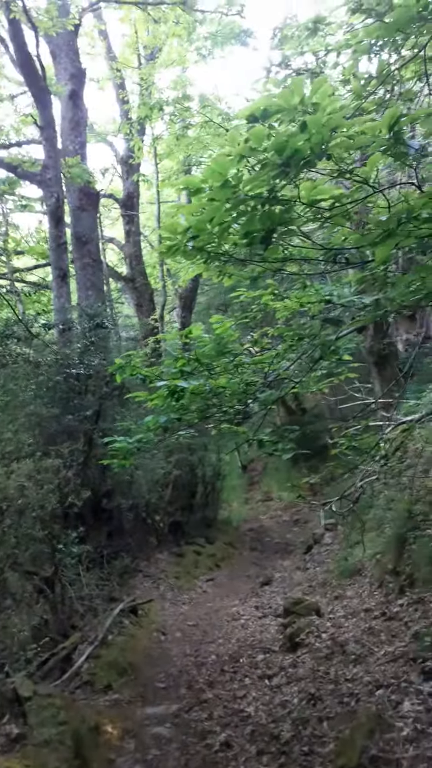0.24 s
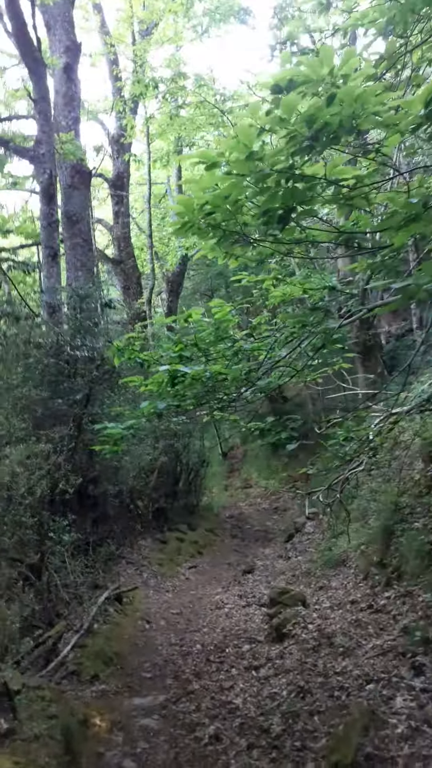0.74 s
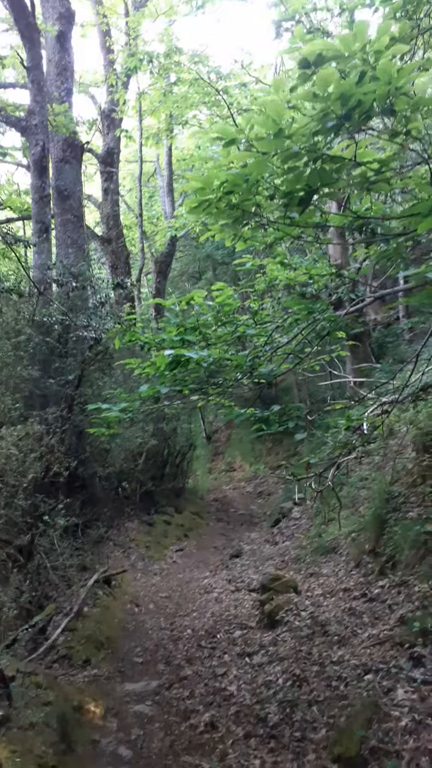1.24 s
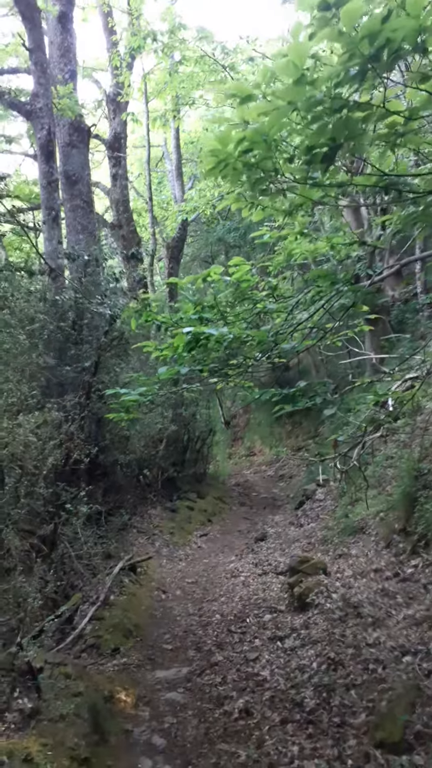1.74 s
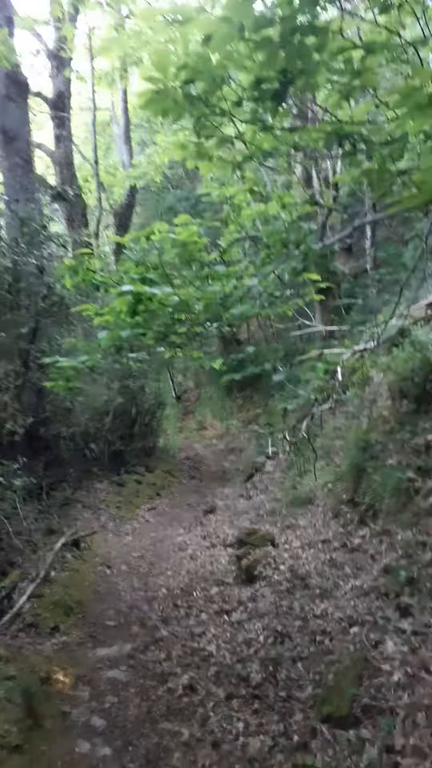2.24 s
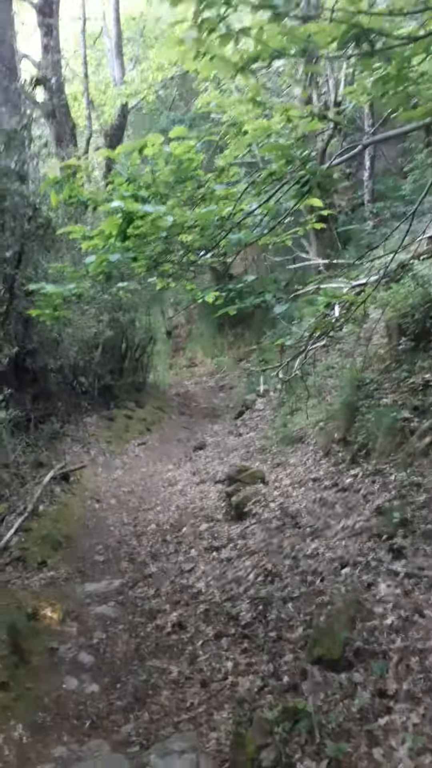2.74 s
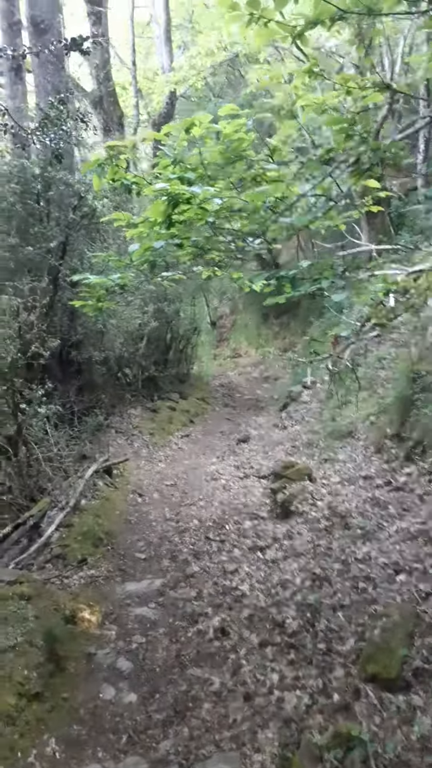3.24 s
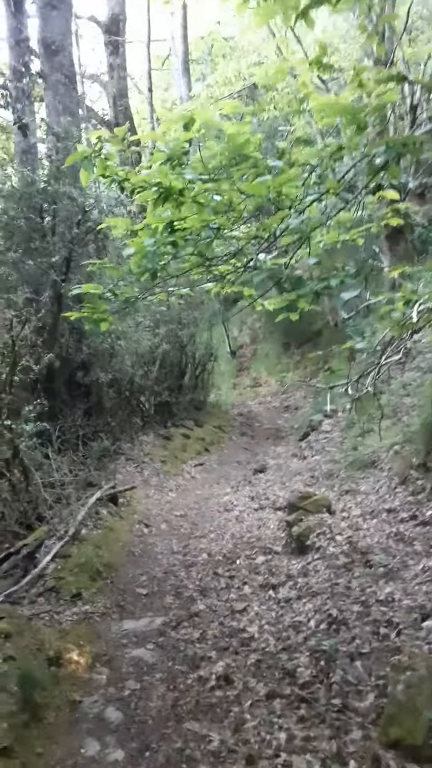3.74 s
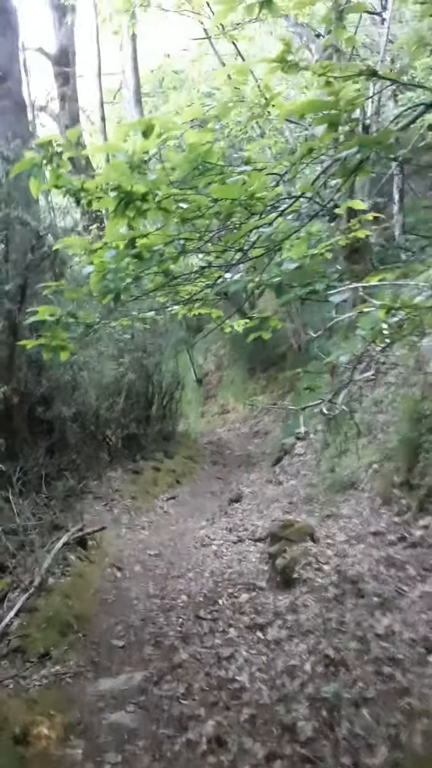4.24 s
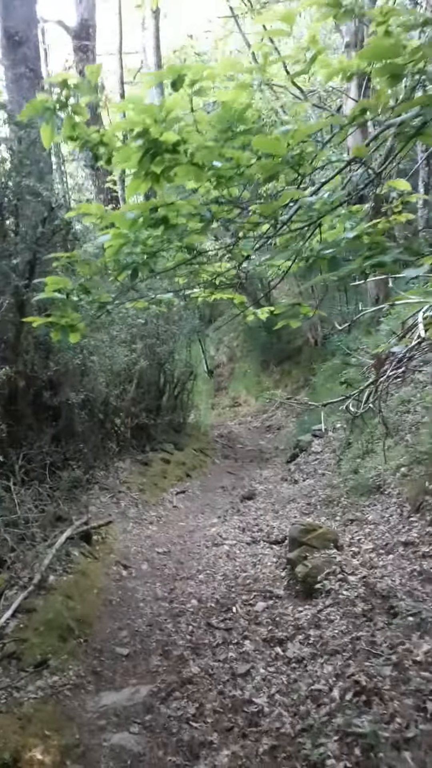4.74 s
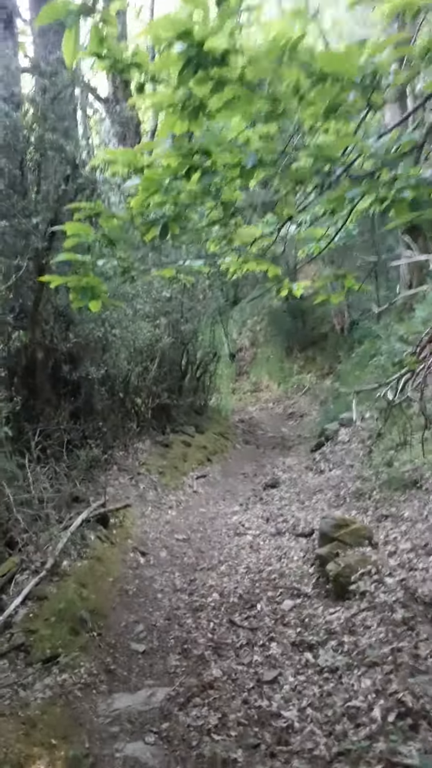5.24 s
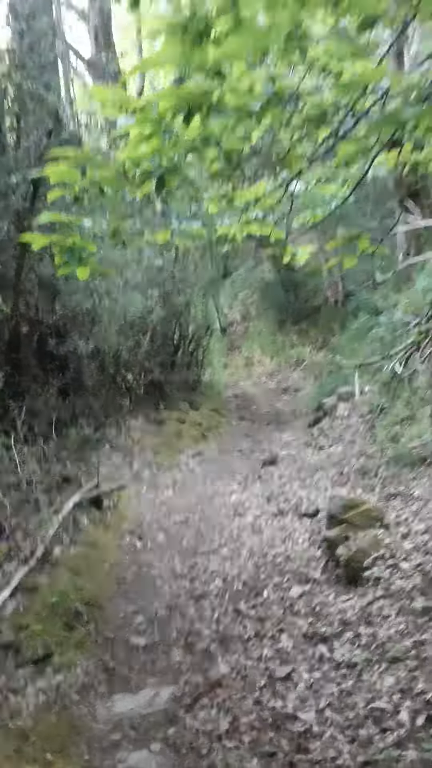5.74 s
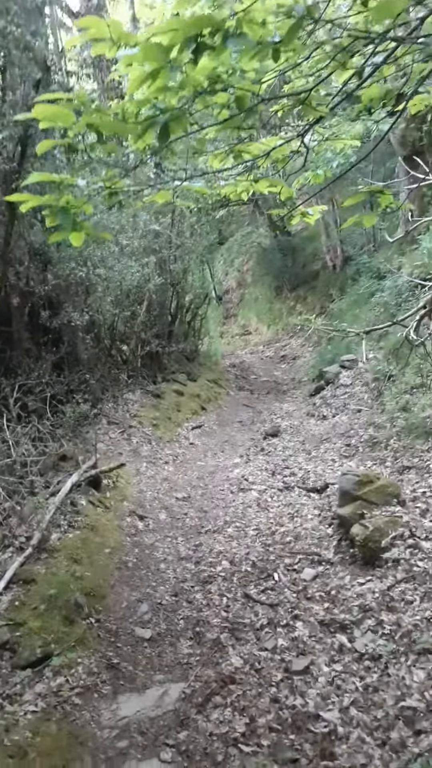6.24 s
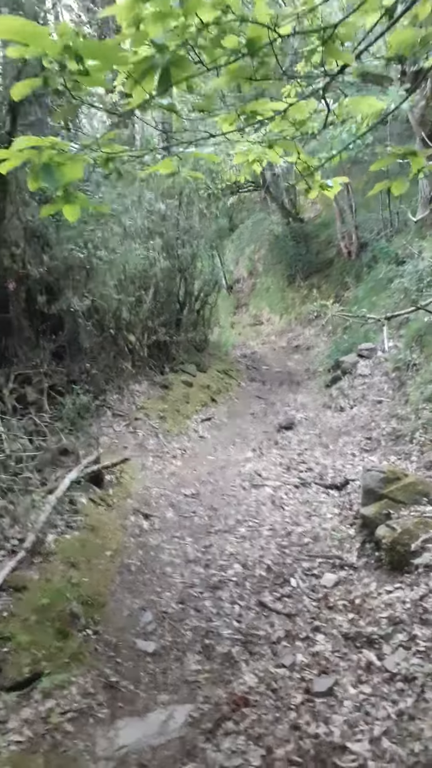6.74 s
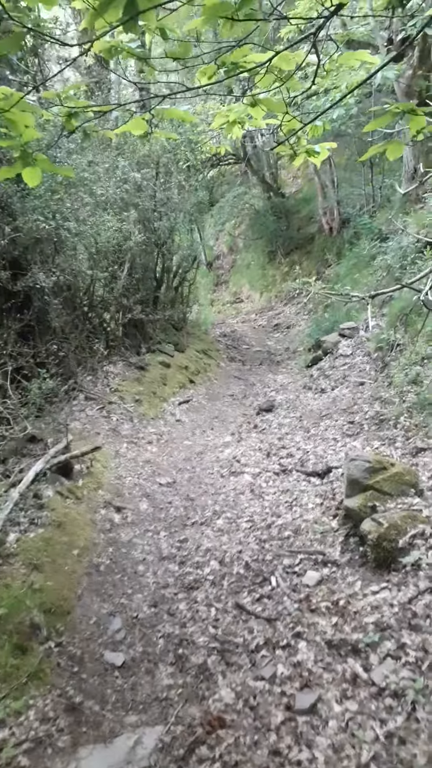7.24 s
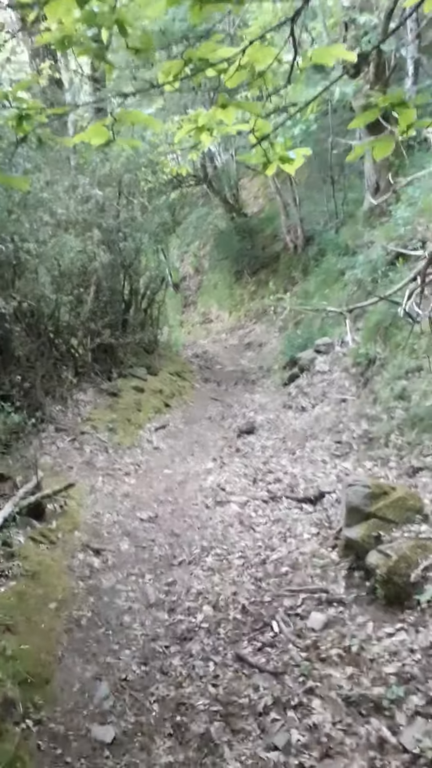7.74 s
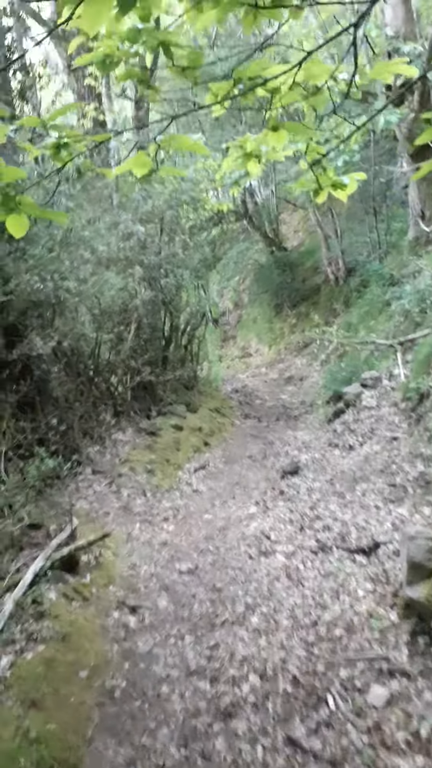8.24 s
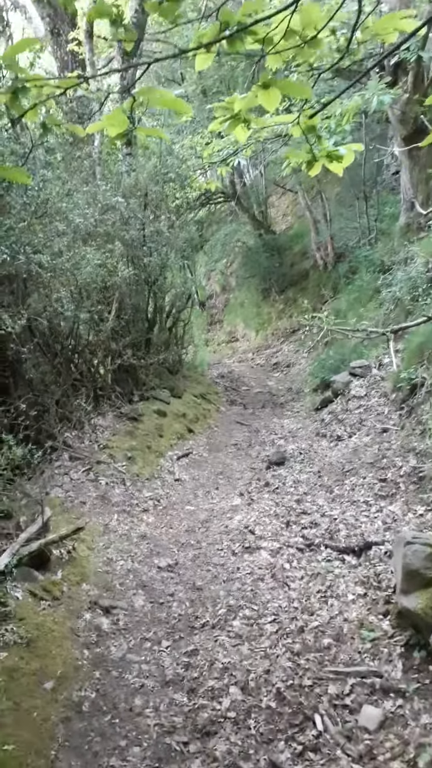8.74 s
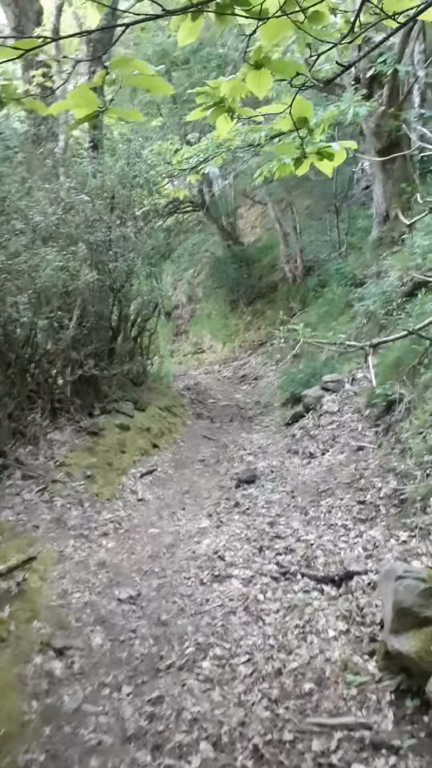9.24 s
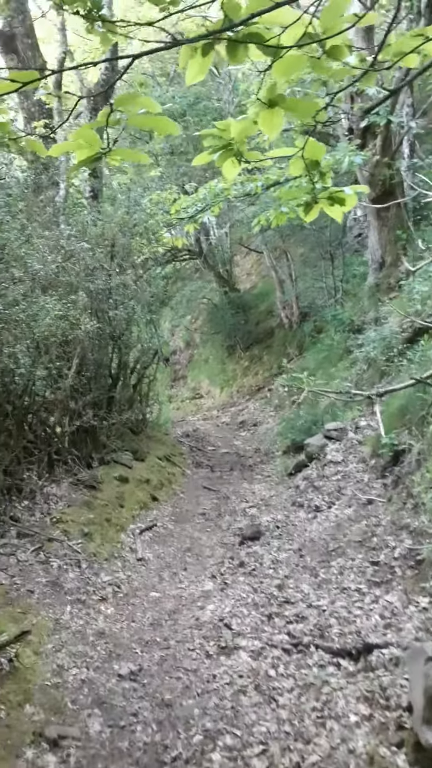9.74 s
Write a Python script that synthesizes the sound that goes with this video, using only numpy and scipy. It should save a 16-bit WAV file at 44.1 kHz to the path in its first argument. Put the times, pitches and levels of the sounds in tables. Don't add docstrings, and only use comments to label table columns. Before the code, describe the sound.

Someone walks through a leafy wood, feet rustling softly and the recorder being bumped, as high-pitched birds whistle and chatter almost without pause.

```python
import sys
import numpy as np
from scipy import signal
from scipy.io import wavfile
from scipy.ndimage import uniform_filter1d

SR = 44100
rng = np.random.default_rng(int(sys.argv[2]) if len(sys.argv) > 2 else 0)


def dump(signal):
    limited = np.clip(np.atleast_2d(signal).T, -1, 1)
    pcm = np.round(limited * 32767).astype(np.int16)
    wavfile.write(sys.argv[1], SR, pcm)


def rack_gain(trim_db):
    fader = np.asarray(trim_db, float)
    return 10 ** (fader / 20)


N = 440118

# start in seconds, rustle level in dB, time to fall 10 dB in seconds.
STEPS = [(0.0, -58, 0.23), (.54, -64, 0.13), (.85, -66.5, 0.34), (1.2, -67, 0.3), (1.51, -64.5, 0.02),
         (1.913, -60.5, 0.24), (2.25, -63.5, 0.08), (2.57, -65.5, 0.22), (2.99, -64, 0.2),
         (3.4, -53.5, 0.1865), (3.66, -57, 0.13), (4.116, -55, 0.1956), (4.57, -61, 0.14),
         (5.02, -58, 0.27), (5.42, -66.5, 0.32), (5.95, -59.5, 0.16), (6.109, -62.5, 0.15),
         (6.55, -67.5, 0.2), (6.87, -61, 0.22), (7.68, -61, 0.2647), (8.53, -63, 0.44),
         (8.979, -64.5, 0.05), (9.375, -63.5, 0.12), (9.67, -70.5, 0.46), (9.97, -66.5, 0.15)]
# frequency in Hz, level in dB per Hz.
LITTER_COLOUR = [(18, -52), (30, -26), (92, -2.5), (174, -8.5), (322, 3.5), (457, -3.5), (916, -5.5),
                 (1990, -4.5), (3190, -16.5), (4000, 30), (5200, -54), (8800, -120)]
# start in seconds, length in seconds, level in dB, pitch in Hz.
SWELLING_WHISTLES = [(.489, 0.096, -38.5, 7350), (.659, 0.089, -42, 7280), (1.36, 0.073, -48, 7500),
                     (1.476, 0.091, -38, 7120), (2.12, 0.085, -47, 7580), (2.55, 0.082, -45.5, 6990),
                     (2.719, 0.11, -45, 7130), (2.959, 0.043, -47.5, 6920), (3.525, 0.11, -41, 7300),
                     (3.862, 0.086, -36, 6980), (4.386, 0.031, -43, 7000), (4.818, 0.05, -42, 7350),
                     (5.257, 0.12, -47.5, 7150), (6.0, 0.098, -36.5, 7180), (6.643, 0.12, -38.5, 7600),
                     (6.945, 0.053, -45.5, 7600), (7.121, 0.094, -42, 7540), (7.546, 0.075, -38.5, 7680),
                     (7.71, 0.076, -37, 7470), (8.308, 0.082, -35.5, 7140), (8.514, 0.11, -41.5, 7520),
                     (8.837, 0.14, -39, 7270), (9.369, 0.073, -41, 7230), (9.508, 0.075, -36, 7280),
                     (9.876, 0.1, -42.5, 7160)]
# start in seconds, length in seconds, level in dB, pitch in Hz.
DYING_WHISTLES = [(0.0, 0.077, -36.5, 6930), (6.11, 0.09, -48, 7600), (.106, 0.11, -39.5, 7410),
                  (.383, 0.18, -42, 6780), (.768, 0.12, -41, 7290), (1.046, 0.18, -49.5, 6960),
                  (1.689, 0.04, -40.5, 7300), (1.739, 0.085, -35.5, 7160), (2.5, 0.036, -56, 7600),
                  (3.086, 0.18, -46.5, 7000), (3.275, 0.1, -49.5, 7460), (4.504, 0.11, -52, 7470),
                  (4.713, 0.12, -56.5, 7220), (5.011, 0.1, -47.5, 7200), (5.091, 0.091, -45, 7600),
                  (5.427, 0.075, -43, 7040), (5.859, 0.23, -44.5, 6920), (6.439, 0.035, -47.5, 7180),
                  (8.145, 0.088, -45.5, 7470)]
# first flick in seconds, last flick in seconds, level in dB,
# fade by the end in dB, bottom of the first dive in Hz.
QUICK_RATTLES = [(0.058, .079, -50, 2.5, 4000), (.19, .19, -62, 0, 4950), (5.128, 5.251, -38.5, 8, 4000),
                 (5.09, 5.09, -37, 0, 5000), (5.003, 5.048, -42.5, -3.5, 4000),
                 (6.012, 6.045, -40, -5, 5900), (6.077, 6.11, -33.5, -1.5, 6030),
                 (9.515, 9.515, -50, 6, 6100), (.7817, .8642, -34.5, 4.5, 4400),
                 (1.4123, 1.4123, -35.5, 0, 6400), (1.452, 1.5612, -37, 1, 4000),
                 (1.691, 1.691, -36, 0, 6800), (1.776, 1.9705, -41.5, 0.5, 4700),
                 (3.568, 3.9533, -36, 2, 5900), (4.854, 4.9627, -41, 4, 6300),
                 (5.015, 5.077, -35.5, 8, 6900), (5.352, 5.382, -38, 7, 4200),
                 (6.657, 6.685, -44, -2, 6700), (6.72, 6.72, -31.5, 0, 6800),
                 (6.76, 6.8731, -37.5, 0, 4000), (7.028, 7.1433, -45.5, -0.5, 4200),
                 (7.641, 7.7417, -37.5, 8.5, 4600), (7.81, 7.9584, -35, 9.5, 4000),
                 (7.775, 7.775, -36, 0, 5100), (7.6, 7.6, -41, 0, 6700), (3.098, 3.098, -40, 0, 7100),
                 (8.32, 8.32, -45, 0, 5000), (8.9434, 9.139, -41.5, 3.5, 6360),
                 (9.379, 9.415, -37.5, 2.5, 5900)]
# first flick in seconds, last flick in seconds, level in dB,
# fade by the end in dB, bottom of the first dive in Hz.
STEADY_RATTLES = [(0.24, .165, -40.5, 0, 6600), (.9311, 1.0162, -38, 3.5, 4000),
                  (.5115, .5115, -45, 0, 5000), (.499, .499, -53, 0, 4900), (.553, .7406, -40, 1.5, 4000),
                  (1.0824, 1.339, -39.5, 0.5, 6340), (1.103, 1.103, -39, 5, 5920),
                  (1.542, 1.7503, -42.5, 7, 5930), (1.8048, 1.9461, -34, 5.5, 4450),
                  (3.154, 3.2798, -38, 7.5, 5500), (3.3955, 3.3955, -46, 0, 4790),
                  (3.9904, 4.2169, -32.5, 4, 4700), (4.2626, 4.2626, -44, 0, 4700),
                  (4.062, 4.062, -41, 0, 5300), (4.0905, 4.0905, -36, 0, 4900),
                  (4.1035, 4.1035, -41, 0, 4900), (4.137, 4.137, -39, 0, 4900),
                  (8.4225, 8.4225, -48, 0, 4900), (8.647, 8.647, -40, 0, 4900),
                  (8.715, 8.715, -44, 0, 4500), (6.122, 6.122, -37, 0, 4600), (.77, .77, -40, 0, 4900),
                  (5.34, 5.34, -41.5, 0, 4900), (5.415, 5.415, -47.5, 0, 4000),
                  (5.31, 5.31, -47.5, 0, 4000), (0.044, .04, -49, 0, 4000), (.1457, .1457, -48.5, 0, 4000),
                  (4.4305, 4.4305, -34.5, 0, 4340), (6.4674, 6.5943, -46, 5, 6800),
                  (8.2128, 8.2128, -41, 0, 7400), (8.262, 8.262, -46.5, 0, 4570),
                  (1.7503, 1.7503, -33, 0, 5700), (8.5936, 8.82, -36.5, 12, 4700),
                  (9.89, 9.89, -44, 5, 5900), (9.452, 9.572, -41, -1.5, 4000),
                  (6.153, 6.337, -39.5, 3.5, 4000)]
# first flick in seconds, last flick in seconds, level in dB,
# fade by the end in dB, bottom of the first dive in Hz.
TIRING_RATTLES = [(2.221, 2.3679, -44, -1, 4670), (2.555, 2.755, -39, 0.5, 6310),
                  (2.8109, 2.9513, -41.5, 4.5, 4760), (4.4486, 4.5998, -40.5, -3, 5496),
                  (5.435, 5.6851, -37.5, 12, 5600), (5.8715, 5.9837, -42, 1, 6860),
                  (8.349, 8.5486, -35, 5.5, 6610), (8.908, 9.0619, -36.5, 8, 4900),
                  (8.8527, 8.8527, -38.5, 0, 6400), (8.882, 8.882, -40.5, 0, 6130),
                  (9.545, 9.7775, -36.5, 4.5, 5770)]
# start in seconds, peak in dB, level of the dull part in dB.
SNAPS = [(0.89, -57.5, -8.5), (2.017, -49.5, -27), (3.1243, -71, -26), (3.2333, -60, -1),
         (3.3717, -39, -13), (3.4111, -41.5, -16.5), (3.527, -29.5, -29), (3.5872, -41, -26),
         (3.6089, -25.5, -48), (4.071, -46, -11), (4.479, -51, -25), (6.4667, -68, -25), (7.3682, -62, -31),
         (7.514, -57.5, -32), (7.6401, -44, -9), (7.844, -49, -28), (7.885, -47, -13.5), (9.7877, -60, -7),
         (0.1453, -59, -9.5), (.4479, -73, -23), (.5342, -61, -22), (0.61, -54, -17), (1.0111, -67, -27),
         (1.073, -67, -20), (1.8317, -43.5, -17), (3.1652, -73, -20), (4.3919, -56, -29),
         (4.5979, -77, -18), (4.9566, -59, -25), (5.4201, -58, -22), (6.0855, -49, -22), (6.109, -50, -12),
         (6.708, -52, -13), (7.3276, -69, -38), (8.1549, -70, -25), (9.207, -67, -29), (9.361, -73, -27),
         (9.9622, -48, -19), (3.3495, -73, -11), (3.421, -50.5, -4), (3.392, -62, -8)]
# start in seconds, peak in dB.
THUMPS = [(0.661, -57.5), (1.79, -54), (2.223, -56), (2.563, -71), (3.362, -48), (3.453, -47), (3.56, -50),
          (4.081, -50), (4.529, -70), (4.715, -57), (4.813, -60), (6.015, -48), (6.517, -67), (6.636, -52),
          (6.827, -71), (7.399, -56), (7.636, -62), (8.204, -60), (8.94, -70), (9.25, -60)]
# start in seconds, peak in dB, hardness in dB.
KNOCKS = [(0.798, -52, -4), (1.743, -47.5, -25), (2.248, -54, -25), (2.496, -53, 8), (2.57, -41.5, -21),
          (3.373, -31.5, -12), (3.414, -33.5, -20), (3.533, -40.5, -34), (3.568, -42, -27),
          (4.084, -29.5, -21), (4.904, -45, -27), (4.947, -43.5, -13), (5.907, -42, -14), (5.947, -38, -21),
          (6.527, -30, -42), (6.637, -46.5, -7.5), (7.393, -45.5, -20), (7.501, -50, -28), (7.639, -33, 0),
          (8.317, -54, 0.5), (9.235, -51.5, -89)]
# frequency in Hz, level in dB, time to fall 60 dB in seconds.
CASE_MODES = [
    (115, -12.5, 0.13),
    (338, 2, 0.027),
    (565, -5, 0.015),
    (874, -6, 0.027),
    (1226, 3, 0.012),
    (1960, -4, 0.0052),
]
# start in seconds, level in dB,
# start pitch in Hz, held pitch in Hz, length in seconds.
HOOKS = [(7.226, -26, 6700, 7480, 0.011), (7.268, -25.5, 5880, 7370, 0.024),
         (7.314, -25, 5410, 6920, 0.023), (7.359, -24.5, 5190, 6670, 0.0214),
         (7.405, -26.5, 4800, 6370, 0.0215), (4.428, -55, 3480, 3320, .03),
         (4.722, -53.5, 3580, 3650, .025), (4.75, -56, 3500, 3300, 0.037), (5.1, -57, 3650, 3120, 0.11),
         (5.244, -60, 3500, 3400, .04), (9.83, -55, 3320, 3155, 0.086)]

STILL_DB, BRIGHT_FOLLOWS = -77.5, 0.45
WOOD_T60_S, PORT_LAG_SAMPLES = 0.39, 20
OCTAVE_DB = -32.5
SWELL_DB, DIE_DB = 4.5, -2
FLICK_PERIOD_S, FLICK_TIRING_S = 0.026, 0.2024
HOLD_PER_DB, HOLD_HZ_PER_DB = 1.3, 35
BREATH_DB = -18
QUICK_GAP_S, STEADY_GAP_S, TIRING_GAP_S = 0.038, 0.043, 0.039
QUICK_SLOWING, STEADY_SLOWING, TIRING_SLOWING = 0.12, 0.0093, 0.24
DIVE_STEP_HZ, THROAT_FLOOR_HZ = 963, 4800
OPENER_LEAD_S, OPENER_DB, OPENER_HZ = 0.012, -4, 4910
ARCH_TOP_HZ, ARCH_SAG_HZ = 7600, 1501
EFFORT_HZ_PER_DB = 71
FLICK_SPREAD_HZ, FLICK_SPREAD_DB = 305.3, 1.92
VOICE_ONSET_HZ = 3700
SNAP_ECHO_DB = -16
THUMP_HZ, THUMP_T60_S, THUMP_DB = 112.6, 0.07, 9.5
MASKED_DB, MASKING_DB = -12, -50


def rms_one(x):
    return x / np.sqrt(np.mean(x ** 2) + 1e-20)


def drift(rate_hz):
    r = np.exp(-2 * np.pi * rate_hz / SR)
    return rms_one(signal.lfilter([1], [1, -2 * r, r * r], rng.standard_normal(N + SR))[SR:])


def band(x, low_hz, high_hz, order=2):
    return signal.sosfilt(signal.butter(order, [low_hz, high_hz], "band", fs=SR, output="sos"), x)


def add(track, s, sound):
    i = max(round(s * SR), 0)
    track[i:i + len(sound)] += sound[:N - i]


def tone(hz):
    phase = 2 * np.pi * np.cumsum(hz) / SR
    return np.sin(phase) + rack_gain(OCTAVE_DB) * np.sin(2 * phase)


def ports(x, left_db, shadow_hz=3500):
    shadowed = signal.sosfilt(signal.butter(1, shadow_hz, fs=SR, output="sos"), x)
    return np.array([rack_gain(left_db) * np.roll(shadowed, PORT_LAG_SAMPLES), x])


def wood(x, wet_db, left_db, left_wet_db, count=4, shadow_hz=3500):
    t, wet = np.arange(round(0.6 * SR)) / SR, 0
    place = np.arange(N) / (0.13 * SR)
    for k in range(count):
        lumps = rack_gain(3.9 * np.exp(-t / 0.052) * rng.standard_normal((2, len(t))))
        decay = rack_gain(-60 * t / WOOD_T60_S) + 0.98 * rack_gain(-60 * t / 0.034)
        tail = rng.standard_normal((2, len(t))) * lumps * decay
        tail *= (t > 0.002) / np.sqrt(np.sum(tail ** 2, axis=1, keepdims=True))
        away = np.abs((place - k + count / 2) % count - count / 2)
        here = np.cos(np.pi / 2 * np.clip(away, 0, 1)) if count > 1 else 1
        wet = wet + signal.fftconvolve((x * here)[None], tail, axes=1)[:, :N]
    wet = band(wet, 1900, 22000, order=1)
    return wet * rack_gain([[left_wet_db], [wet_db]]) + ports(x, left_db, shadow_hz)


def walking():
    t = np.arange(0, N + 64, 64) / SR
    steps = sum(rack_gain(db - 10 * np.abs(t - s) / fall_s) ** 2 for s, db, fall_s in STEPS)
    return np.interp(np.arange(N) / SR, t, 10 * np.log10(rack_gain(STILL_DB) ** 2 + steps))


def crackle(per_s, spread_db):
    sizes = rack_gain(spread_db * np.minimum(rng.exponential(1, N), 4)) * rng.standard_normal(N)
    return rms_one(sizes * (rng.random(N) < per_s * rack_gain(5.0 * drift(7)) / SR))


def rustle():
    step_db = walking()
    shared, own = rng.standard_normal((2, 2, N))
    shared = shared + 0.64 * np.array([crackle(500, 2.9), crackle(300, 6.5)])
    litter, together = 0, drift(22)
    edges = 30 * 2 ** np.arange(0, 7.1, 0.5)
    hz, per_hz = np.transpose(LITTER_COLOUR)
    for k, (low, high) in enumerate(zip(edges, edges[1:])):
        near, apart = band(np.array([shared[k % 2], own[k % 2]]), low, high)
        colour_db = np.interp(np.log(low * high) / 2, np.log(hz), per_hz)
        gain = rack_gain(colour_db + 1.56 * together + 2.57 * drift(2.7))
        alike = 0.1 if high < 100 else 0.6 if high < 600 else 0.55
        left = alike * np.roll(near, PORT_LAG_SAMPLES) + np.sqrt(1 - alike ** 2) * apart
        litter = litter + gain * np.array([left * rack_gain(-5.0 if high < 900 else -8), near])
    hiss = rng.standard_normal((2, N)) + 0.3 * crackle(670, 6.8)
    air = band(hiss, 4500, 8300, order=3) * rack_gain([[-79], [-73]] + 1.14 * (step_db + 81))
    bright = band(hiss + 0.11 * crackle(120, 3.9), 10350, 15800, order=6)
    bright *= rack_gain([[-68], [-65]] + BRIGHT_FOLLOWS * (step_db + 64.0) + 2.0 * drift(8.2))
    return rms_one(litter) * rack_gain(step_db + 3.5) + bright + air


def whistles():
    return [(s, length, db - change_db / 2, db + change_db / 2, hz)
            for rows, change_db in ((SWELLING_WHISTLES, SWELL_DB), (DYING_WHISTLES, DIE_DB))
            for s, length, db, hz in rows]


def whistle(swing_hz, fade_db):
    out = np.zeros(N)
    beat = np.cumsum(rack_gain(1.18 * drift(15.46))) / SR / FLICK_PERIOD_S
    reach_hz = swing_hz * rack_gain(1.5 * drift(20.8))
    waver_hz, waver_db = 130 * drift(118), 3.6 * drift(130)
    for s, length, first_db, last_db, hz in whistles():
        i = np.arange(round(s * SR), min(round((s + length) * SR), N))
        u = (i - i[0]) / len(i) * 2 - 0.5
        lift = (1 - np.abs(2 * ((beat[i] - beat[i[0]]) % 1) - 1)) ** 1.7
        edges = np.clip(np.minimum(i - i[0], i[-1] - i) / (0.0016 * SR), 0, 1)
        haste = rack_gain(HOLD_PER_DB * (first_db + 43))
        flick_hz = reach_hz[i] * lift * np.exp(-(i - i[0]) / SR / FLICK_TIRING_S * haste)
        settled_hz = hz + HOLD_HZ_PER_DB * (first_db + 45) - 450 * (u - 0.5)
        pitch = np.clip(settled_hz + waver_hz[i] + flick_hz, 5000, 9600)
        level_db = first_db + (last_db - first_db) * u + waver_db[i] - fade_db * lift
        out[i] += rack_gain(level_db) * edges * tone(pitch)
    return out


def flicks_of(rattles, gap_s, slowing):
    dips, arches = [], []
    chances = rng.normal(size=(len(rattles), 12, 2))
    for (first_s, last_s, level_db, fade_db, dive_hz), chance in zip(rattles, chances):
        gaps = round((last_s - first_s) / gap_s)
        for k in range(gaps + 1):
            u = k / max(gaps, 1)
            s = first_s + (last_s - first_s) * (u - slowing * u * (1 - u))
            db = level_db - fade_db * u ** 1.65 + FLICK_SPREAD_DB * chance[k, 0] * (k > 0)
            off_hz = FLICK_SPREAD_HZ * chance[k, 1]
            bottom_hz = dive_hz - DIVE_STEP_HZ * k
            if bottom_hz >= THROAT_FLOOR_HZ:
                dips.append((s, db, bottom_hz))
                continue
            first_arch = k == 0 or bottom_hz + DIVE_STEP_HZ >= THROAT_FLOOR_HZ
            if gaps > 2 and first_arch:
                dips.append((s - OPENER_LEAD_S, db + OPENER_DB, OPENER_HZ + off_hz))
            top_hz = ARCH_TOP_HZ - ARCH_SAG_HZ * u ** 0.593 + EFFORT_HZ_PER_DB * (db + 36)
            arches.append((s, db, top_hz + off_hz))
    return dips, arches


def rattle(flicks, hz_per_ms, ms_wide, trim_db, throat_hz):
    out, ms = np.zeros(N), np.arange(-352, 353) / SR * 1000
    for (s, level_db, turn_hz), chance in zip(flicks, rng.normal(size=(len(flicks), 6))):
        twin = (0.006 + 0.0015 * chance[2], -8.0 + 4.2 * chance[3], 0.85 + 0.0613 * chance[4])
        for late_s, twin_db, bend in ((0, 0, 1), twin):
            hz = turn_hz * bend - hz_per_ms * rack_gain(chance[0]) * (np.sqrt(ms ** 2 + 0.5) - 0.77)
            off_hz = hz - np.clip(turn_hz, 4900, 5500)
            throat = rack_gain(-6.5) + np.exp(-(off_hz / np.where(off_hz > 0, throat_hz, 950)) ** 2)
            shape = np.exp(-((ms - 1.0 - 4.0 * chance[1]) / ms_wide) ** 2) * np.hanning(len(ms))
            sounding = np.clip((hz - np.where(ms < 0, VOICE_ONSET_HZ, 1400)) / 800, 0, 1)
            sounding = sounding * np.clip((9300 - hz) / 1300, 0, 1)
            flick = rack_gain(level_db + trim_db + twin_db) * throat * shape * sounding * tone(hz)
            add(out, s + late_s + ms[0] / 1000, flick)
    return out


def snaps():
    bright, dull, t = np.zeros(N), np.zeros(N), np.arange(round(0.016 * SR)) / SR
    for (s, peak_db, low_db), noise in zip(SNAPS, rng.normal(size=(len(SNAPS), len(t)))):
        crack = noise * (rack_gain(-60 * t / 0.0039) + 0.032 * rack_gain(-60 * t / 0.046))
        crack = crack / np.abs(crack).max()
        add(bright, s, rack_gain(peak_db + 20.5) * crack)
        add(dull, s, rack_gain(peak_db + low_db + 36.5) * crack)
    return band(bright + 1e-18, 2920, 14000) + band(dull + 1e-18, 1260, 4800)


def thumps():
    out, t = np.zeros(N), np.arange(round(0.1 * SR)) / SR
    for (s, peak_db), tune in zip(THUMPS, rng.normal(size=len(THUMPS))):
        ring = np.sin(2 * np.pi * THUMP_HZ * (1 + 0.23 * tune) * t) * (1 - np.exp(-t / 0.0053))
        add(out, s + 0.0037, rack_gain(peak_db + THUMP_DB - 60 * t / THUMP_T60_S) * ring)
    return out


def knocks():
    out, t = np.zeros(N), np.arange(round(0.12 * SR)) / SR
    rubs = rng.normal(size=(len(KNOCKS), len(t))) * rack_gain(-35.0 - 60 * t / 0.2)
    rubs[:, 0] = 1
    chances = rng.normal(size=(len(KNOCKS), 2, len(CASE_MODES)))
    for (s, peak_db, hard_db), chance, rub in zip(KNOCKS, chances, rubs):
        for (hz, level_db, t60), gain, tune in zip(CASE_MODES, *chance):
            reach_db = level_db + 2.3 * gain + (hard_db + 6 if hz > 700 else 0)
            ring = np.sin(2 * np.pi * hz * (1 + 0.094 * tune) * t)
            ring = ring * rack_gain(peak_db + reach_db - 60 * t / t60)
            add(out, s + 0.001976, signal.fftconvolve(ring, rub))
    return band(out + 1e-18, 208, 7000)


def hooks():
    out = np.zeros(N)
    for s, level_db, start_hz, held_hz, length in HOOKS:
        u = np.linspace(0, 1, round(length * SR))
        near = held_hz > 5000
        rise_hz = (held_hz - start_hz) * np.clip(1 - u / 0.44, 0, 1) ** 1.16
        hz = held_hz - rise_hz - (250 if near else 80) * u ** 3
        broken = 1
        if not near:
            broken = 0.62 + np.convolve(rng.standard_normal(len(u)), np.hanning(300), "same") / 30
        add(out, s, rack_gain(level_db) * broken * np.sin(np.pi * u ** 0.89) ** 0.91 * tone(hz))
    return out


def scene():
    flock = ((QUICK_RATTLES, QUICK_GAP_S, QUICK_SLOWING), (STEADY_RATTLES, STEADY_GAP_S, STEADY_SLOWING),
             (TIRING_RATTLES, TIRING_GAP_S, TIRING_SLOWING))
    dips, arches = (sum(kind, []) for kind in zip(*(flicks_of(*bird) for bird in flock)))
    flicks = rattle(arches, 799.8, 31.0, 1.5, throat_hz=1450)
    flicks = flicks + rattle(dips, -1114.24, 4.3, 3.66, throat_hz=2460)
    thin = rack_gain(-2.0) * whistle(1407, fade_db=8.5)
    breath = rms_one(band(rng.standard_normal(N), 8200, 9580, order=3))
    thin = thin + rack_gain(BREATH_DB) * uniform_filter1d(np.abs(thin), size=200) * breath
    flicks, thin = band(np.array([flicks, thin]), 1500, 12300, order=6)
    birds = wood(flicks, 0.11, -33.0, -7.5) + wood(thin, 1.0, -43.0, -6.0)
    birds = birds + wood(hooks(), -5.5, -29, -11.0, count=1)
    handling = ports(knocks(), -6.5) + ports(thumps(), -17)
    twigs = wood(snaps(), SNAP_ECHO_DB, -11, -5, count=1, shadow_hz=9000)
    return birds + rustle() + handling + twigs


def low_pass(x):
    return signal.sosfilt(signal.butter(12, 16870, fs=SR, output="sos"), x)


def record(dry):
    cut = signal.sosfilt(signal.cheby2(10, 50, 16800, fs=SR, output="sos"), dry)
    calls_db = 10 * np.log10(uniform_filter1d(band(cut[1], 4760, 7700) ** 2, size=1500) + 1e-12)
    starved = rack_gain(MASKED_DB * np.clip((calls_db - MASKING_DB) / 8.0, 0, 1))
    above = signal.sosfiltfilt(signal.butter(3, [9600, 12000], "band", fs=SR, output="sos"), cut)
    return low_pass(cut - (1 - starved) * above)


dry = scene()
out = record(dry)
dump(out)
```